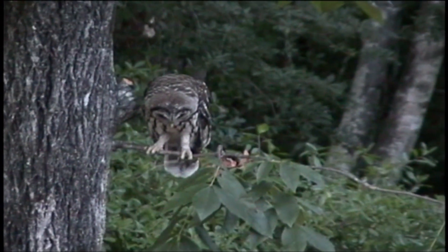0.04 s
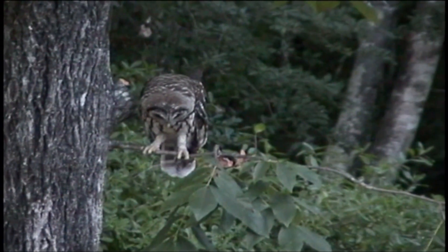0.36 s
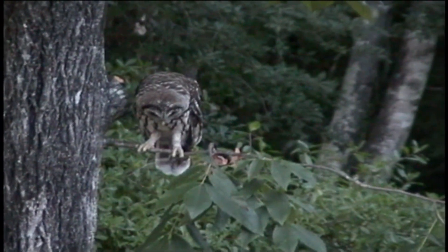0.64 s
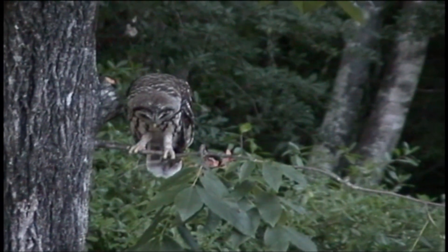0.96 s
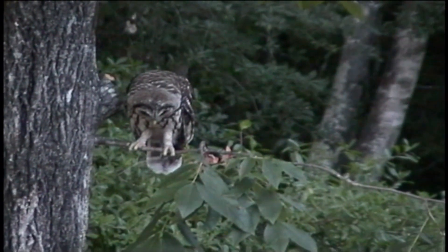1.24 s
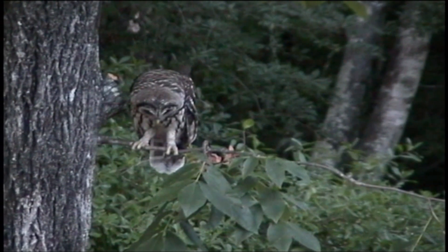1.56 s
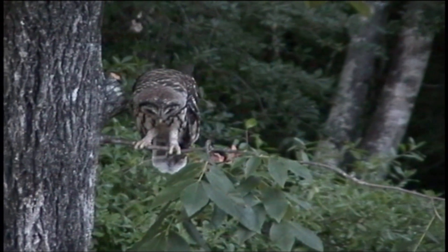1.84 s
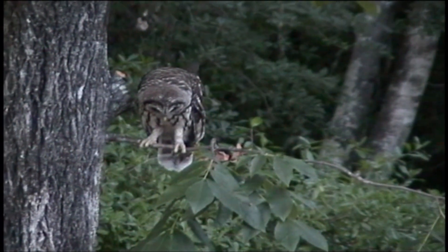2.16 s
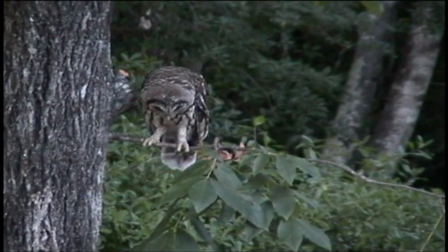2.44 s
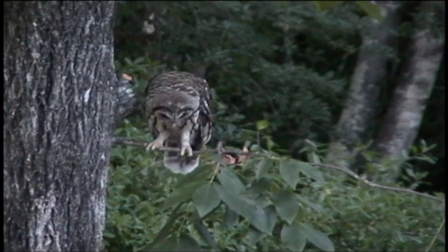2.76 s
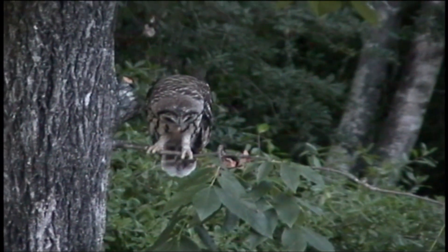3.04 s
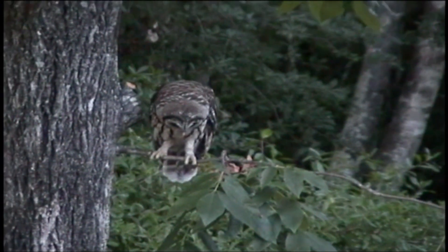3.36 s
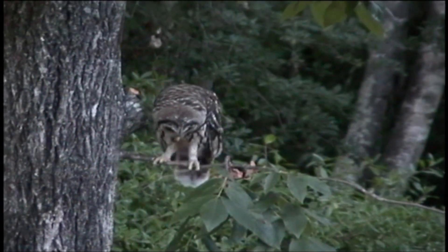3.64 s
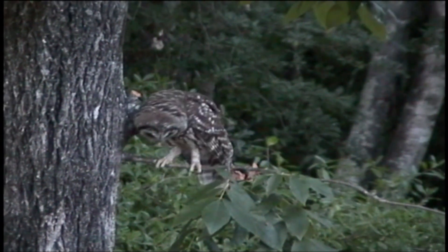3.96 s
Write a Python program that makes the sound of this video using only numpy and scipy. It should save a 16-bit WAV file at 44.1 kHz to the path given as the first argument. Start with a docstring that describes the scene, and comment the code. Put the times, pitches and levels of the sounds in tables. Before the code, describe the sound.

An owl screeches in woodland. A distant call falls away at the very start. From about 0.9 to 2 seconds, the near owl gives a hissy, rasping whistle that holds, rises, then drops sharply. A fainter owl answers from 2.8 seconds, and the near one starts again at 3.7. Throbbing insects, low rushing air and a faint motor hum continue throughout, with a few soft, distant hoots before 2 seconds.

```python
"""Begging owls in a wood

An owl on a branch gives a hissy begging screech: a rasping whistle that rises, then drops off sharply,
wrapped in the hiss of air rushing through its beak. A fainter owl calls from deeper in the wood, and the
near one starts again. Trunks and leaves scatter the calls. Behind them are a throbbing, insect-like
shrill, the low rush of the air, the hum of a distant motor and a few faint hoots."""
import sys
import numpy as np
from scipy import signal
from scipy.fft import rfft, irfft
from scipy.io import wavfile
from scipy.ndimage import uniform_filter1d

SR = 44100
rng = np.random.default_rng(int(sys.argv[2]) if len(sys.argv) > 2 else 0)


def wav_out(sig):
    """Save sig, one row per channel (or a flat mono array), as 16-bit PCM at SR to the path in sys.argv[1]."""
    wavfile.write(sys.argv[1], SR, np.round(np.clip(np.atleast_2d(sig).T, -1, 1) * 32767).astype(np.int16))


N = 176400
TIME = np.arange(N) / SR
SIDES = np.array([[1], [-1]])   # plus for the left ear, minus for the right
TOP_WHISTLE_WIDTH_HZ, THROAT_WIDTH_HZ = 500, 160   # a wider tone sounds breathier
JITTER_PER_S = 209   # how fast the main whistle's pitch trembles

# the near owl's whistle, one list per screech: time_s, pitch_hz, level_db, hoarseness (0 to 1)
WHISTLES = [
    [(.92, 4630, -52, 0.85), (1.045, 4454, -42, 0.93), (1.07, 4580, -47, .4), (1.11, 4530, -43, 0.47),
     (1.15, 4406, -39, 0.54), (1.28, 4433, -38.5, 0.57), (1.39, 4558, -45, 0.51), (1.48, 4580, -40, 0.33),
     (1.52, 4600, -41, 0.7), (1.58, 4690, -42, 0.7), (1.65, 5110, -42.5, 0.92), (1.76, 5840, -39.5, 0.73),
     (1.82, 6020, -38, 0.68), (1.875, 6170, -35.5, 0.73), (1.92, 5810, -38.5, 0.86),
     (1.942, 4920, -33.5, 0.64), (1.953, 4390, -37, 0.46), (1.962, 4200, -41, 0.4), (1.972, 3760, -33, .6)],
    [(3.70, 4690, -48, 0.95), (3.86, 4620, -45, 0.9), (3.876, 4540, -48, 0.42), (3.895, 4590, -51, 0.39),
     (3.925, 4500, -49, 0.37), (3.945, 4460, -56, 0.42), (3.968, 4380, -47, .3), (4.0, 4400, -44, 0)],
]


def from_db(db):
    """Turn decibels into a number to multiply a sound by."""
    return 10 ** (np.asarray(db) / 20)


def rms_one(x):
    """Scale a signal so that its average strength (rms) is 1."""
    return x / np.sqrt(np.mean(np.abs(x) ** 2) + 1e-20)


def at_hz(points, hz):
    """Read between the rows of a frequency table, giving every octave equal room."""
    row_hz, values = np.transpose(points)
    return np.interp(np.log(hz + 1e-9), np.log(row_hz), values)


def in_time(rows):
    """Join timed rows with straight lines, giving one curve for each column after the time."""
    time_s, *columns = np.transpose(rows)
    return [np.interp(TIME, time_s, column) for column in columns]


def gate(rows):
    """Switch a sound on at its first row and off at its last, softly enough not to click."""
    is_on = (TIME >= rows[0][0]) & (TIME <= rows[-1][0])
    return uniform_filter1d(is_on * 1., size=256)


def drift(per_s):
    """A smooth random wobble of strength 1 that moves up to about this many times a second."""
    smoothing = signal.butter(2, min(per_s, SR / 4), fs=SR / 2, output="sos")
    slow = signal.sosfilt(smoothing, rng.standard_normal(N // 2 + 8192))[8192:]   # let the filter settle
    return rms_one(np.interp(np.arange(N) / 2, np.arange(len(slow)), slow))


def phase_of(hz):
    """How far a wave of steady or moving pitch has turned, in radians."""
    return 2 * np.pi * np.cumsum(hz * np.ones(N)) / SR


def resonance(hz, width_hz):
    """Swirling air rings around one pitch, making a band of noise of strength 1."""
    phase = phase_of(hz)
    return drift(width_hz / 2) * np.cos(phase) + drift(width_hz / 2) * np.sin(phase)


def spread(mid, side, hz):
    """Blend two unrelated sounds into a wide stereo pair that sits mostly a little to the left."""
    # how alike the two ears are: frequency_hz, likeness (1 the same, 0 unrelated, -1 opposite)
    likeness = [(60, 1), (130, 0.68), (290, 1), (640, 0.88), (1410, 0.65), (3100, 0.62), (6820, 0.2),
                (15000, -0.36)]
    # how much louder the left ear is: frequency_hz, left_minus_right_db
    balance = [(100, 1.5), (1000, 0.9), (2600, 1.5), (4500, 2.5), (8000, -0.5), (15000, -0.5)]
    alike = np.clip(at_hz(likeness, hz), -.99, .99)
    pair = (np.sqrt(1 + alike) * mid + np.sqrt(1 - alike) * side * SIDES) / np.sqrt(2)
    return pair * from_db(SIDES * at_hz(balance, hz) / 2)


def wash(spectrum):
    """Wide stereo noise of strength 1, with the fine peaks and dips that echoes leave in its spectrum."""
    ripple_db, ripple_step_hz = 1.8, 35
    hz = np.arange(N // 2 + 1) * SR / N
    ripple = np.interp(hz / ripple_step_hz, np.arange(4096), rng.standard_normal(4096))
    colour = from_db(at_hz(spectrum, hz) + ripple_db * ripple) * (hz < spectrum[-1][0])
    mid, side = rfft(rng.standard_normal((2, N)))
    return rms_one(irfft(spread(mid, side, hz) * colour, N))


def air_rush():
    """The air makes a low, steady rush."""
    # the colour of the rush: frequency_hz, relative_level_db
    spectrum = [(15, -59), (25, -38), (48, -18), (81, -13), (94, -13), (108, -14), (198, -7.5), (222, -11),
                (350, -3), (421, -4.5), (554, -10.5), (596, -15.5), (654, -10), (876, -14.5), (1030, -14),
                (1130, -16), (2000, -18.5), (2600, -73), (4400, -120)]
    return from_db(-54.5) * wash(spectrum)


def motor():
    """A distant motor hums; its tones waver separately in level and together in pitch."""
    # the tones of the hum: pitch_hz, level_db
    tones = [(56.6, -77.5), (113.2, -64), (120, -66.5), (150, -70.5), (169.6, -72.5), (226.2, -68.5),
             (452, -78), (564.5, -68), (1035, -73.5), (1302, -78.5), (1360, -74.5)]
    waver_db, speed_wander = 2.5, 0.00407   # the wander is a share of the speed
    speed = 1 + speed_wander * drift(per_s=3.18)
    hum = 0
    for hz, db in tones:
        level = from_db(db + waver_db * drift(per_s=7.3))
        hum += level * np.sin(phase_of(hz * speed) + rng.uniform(0, 2 * np.pi))
    return np.sqrt(2) * hum * from_db(SIDES * 1.0)


def shrill():
    """An insect-like hiss whose narrow bands throb in one rhythm, with two ticks a cycle."""
    # the colour of the hiss: frequency_hz, relative_level_db
    spectrum = [(1850, -35), (2100, -10.5), (2400, -6), (3300, -2.5), (4400, -2.5), (5100, 3), (6100, -1.5),
                (7000, -8), (8000, -16), (10000, -13.5), (12000, -18), (14500, -25.5), (16000, -31)]
    # the throbbing bands: pitch_hz, width_hz, level_db, peak_place (0 to 1 of a cycle), swing_db
    bands = [(2491, 220, -59, 0.26, 6), (2911, 130, -56, 0.34, 3), (3717, 39, -55.5, 0.36, 7),
             (3875, 51, -56.5, 0.29, 1), (4410, 350, -50, 0.42, 1), (4914, 36, -53.5, 0.17, 2),
             (5860, 41, -58.5, 0.15, 2)]
    # the slow swell of the whole shrill: time_s, gain_db
    swell = [(0, 0.6), (.5, 0), (2.1, 0.6), (2.5, -0.2), (3.0, 0.5), (4.0, 0.5)]
    throbs_per_s, tick_db, tick_s, tick_places = 11.082, 3, 0.014, (0, 0.53)
    sound = from_db(-42.5) * wash(spectrum)
    for hz, width_hz, db, peak_place, swing_db in bands:
        cycle = TIME * throbs_per_s - peak_place
        seconds_from_ticks = [((cycle - place + .5) % 1 - .5) / throbs_per_s for place in tick_places]
        ticks = sum(np.exp(-(gap_s / tick_s) ** 2) for gap_s in seconds_from_ticks)
        throb = rms_one(from_db(swing_db * np.cos(2 * np.pi * cycle) + tick_db * ticks))
        band = spread(resonance(hz, width_hz), resonance(hz, width_hz), hz)
        sound += from_db(db) * throb * band
    swell_db, = in_time(swell)
    return from_db(swell_db) * sound


def airy_tone(rows, width_hz):
    """A breathy whistle that follows rows of time_s, pitch_hz, level_db."""
    hz, db = in_time(rows)
    return gate(rows) * from_db(db) * resonance(hz, width_hz)


def beak_hiss(rows):
    """Air rushes through the beak, which rings at higher pitches as it opens."""
    # where the beak rings: pitch_hz (before stretching), width_hz, relative_level_db
    beak = [(990, 590, -17.5), (1390, 230, -22.5), (1959, 150, -15), (3302, 2000, -10.5), (4287, 500, -1),
            (5540, 900, -4.5), (7550, 1440, -6), (9460, 670, -14), (11560, 1400, -18), (13700, 750, -28.5)]
    db, stretch = in_time(rows)
    ringing = sum(from_db(ring_db) * resonance(hz * stretch, width_hz) for hz, width_hz, ring_db in beak)
    return gate(rows) * from_db(db) * ringing


def woodland(sound, echo_db):
    """Trunks and leaves send back short echoes from the sides, which widen the sound."""
    fade_s = 0.4   # time to fall by 60 dB
    t = TIME[:SR // 2]
    echoes = rng.standard_normal(len(t)) * from_db(-60 * t / fade_s)
    echoes /= np.sqrt(np.sum(echoes ** 2))
    return sound + from_db(echo_db) * signal.fftconvolve(sound, echoes)[:N] * SIDES


def far_owl():
    """From deeper in the wood come the falling end of one screech and, later, a soft answer."""
    # its whistle, one list per screech: time_s, pitch_hz, level_db
    whistles = [
        [(0, 5950, -56), (.03, 5850, -46), (.06, 5130, -43.5), (.083, 4340, -48), (.10, 4120, -56)],
        [(2.85, 5000, -56), (3.1, 5134, -47.5), (3.33, 5290, -48), (3.45, 5360, -51), (3.6, 5530, -48),
         (3.8, 5620, -53)],
    ]
    # the thin, high whistle of its answer: time_s, pitch_hz, level_db
    top_whistle = [(2.8, 10500, -72), (2.9, 10560, -65), (3.25, 10430, -61.5), (3.5, 10540, -71)]
    # the hiss of its first screech: time_s, level_db, beak_stretch (times the beak's pitches)
    breath = [(0, -53, 0.99), (.09, -56, 0.92), (.17, -60, 0.79)]
    # the low throat tone of its first screech: time_s, pitch_hz, level_db
    throat = [(0, 1320, -67), (.1, 1286, -59.5), (.22, 1290, -63)]
    voice = sum(airy_tone(rows, width_hz=240) for rows in whistles)
    voice += airy_tone(top_whistle, TOP_WHISTLE_WIDTH_HZ)
    voice += beak_hiss(breath)
    voice += airy_tone(throat, THROAT_WIDTH_HZ)
    return woodland(voice, echo_db=-7.0) * from_db(SIDES * 1.3)


def hoots():
    """Soft, wavering tones swell and fade in the distance."""
    # the hoot-like swells: peak_s, half_length_s, pitch_hz, level_db
    swells = [(0.09, 0.1, 360, -55.5), (0.53, 0.071, 380, -54), (1.21, 0.04, 394.4, -58.5),
              (1.699, 0.16, 370.7, -61), (1.86, 0.037, 329.5, -59)]
    waver_hz = 12.6
    sound = 0
    for peak_s, half_length_s, hz, db in swells:
        level = from_db(db) * np.exp(-((TIME - peak_s) / half_length_s) ** 2)
        sound += level * np.sin(phase_of(hz + waver_hz * drift(per_s=28.3)))
    return np.sqrt(2) * sound


def hiss_echoes(sound):
    """Hiss reaches each ear with its own short trail of echoes from leaves and trunks."""
    echo_db, fade_s = -2.5, 0.12   # the trail falls by 60 dB in fade_s
    t = TIME[:SR // 2]
    echoes = rng.standard_normal((2, len(t))) * from_db(-60 * t / fade_s)
    echoes /= np.sqrt(np.sum(echoes ** 2, axis=1, keepdims=True))
    return sound + from_db(echo_db) * signal.fftconvolve(sound[None], echoes, axes=1)[:, :N]


def puffs():
    """Sudden puffs of hiss escape as the beak opens and shuts."""
    # the puffs: peak_s, half_length_s, pitch_hz, width_hz, level_db
    bursts = [(0.927, .04, 10900, 1600, -56), (1.923, .016, 11200, 1200, -53),
              (1.969, 0.0083, 7470, 700, -45), (3.708, .034, 11000, 1400, -53),
              (3.715, .025, 7400, 600, -52), (3.75, 0.078, 1904, 197, -61)]
    sound = 0
    for peak_s, half_length_s, hz, width_hz, db in bursts:
        level = from_db(db) * np.exp(-((TIME - peak_s) / half_length_s) ** 4)   # flat top, steep edges
        sound += level * resonance(hz, width_hz)
    return sound


def whistle(rows):
    """The main whistle: a clean tone gives way to noise as it gets hoarser, and rasps most halfway."""
    jitter_hz, width_hz = 140.2, 310
    octave_db, octave_width_hz = -17.5, 990
    rasp_db, rasp_per_s = 0.9, 96
    hz, db, hoarseness = in_time(rows)
    hoarseness = np.clip(hoarseness, 0, 1)
    roughness = np.sqrt(hoarseness)
    core = np.sqrt(2) * np.sin(phase_of(hz + roughness * jitter_hz * drift(JITTER_PER_S)))
    breath = resonance(hz, width_hz) + from_db(octave_db) * resonance(2 * hz, octave_width_hz)
    tone = np.sqrt(1 - hoarseness) * core + roughness * breath
    depth = np.log(from_db(rasp_db)) * 4 * hoarseness * (1 - hoarseness)
    rasp = np.exp(depth * np.minimum(drift(rasp_per_s), 2) - depth ** 2)   # a fast flutter in level
    return gate(rows) * from_db(db) * tone * rasp


def spurts():
    """The whistle catches and breaks through the hiss in brief, unsteady swells on its own pitch."""
    # the moments when it catches: peak_s, half_length_s, level_db
    catches = [(1.074, 0.0088, -37), (1.103, 0.0087, -37), (1.15, .0025, -36), (1.16, 0.0046, -34),
               (1.184, 0.0054, -37), (1.213, 0.0023, -32), (1.229, 0.0026, -30), (1.262, 0.0069, -38),
               (1.2825, .0035, -29.5), (1.2975, 0.0015, -32), (1.319, 0.0053, -34), (1.3318, 0.0037, -29.5),
               (1.352, 0.0059, -36.5), (1.376, .006, -35), (1.390, 0.0085, -34.5), (1.403, 0.0028, -32.5),
               (1.429, 0.0044, -31.5), (1.439, 0.0032, -34.5), (1.46, .005, -39), (1.476, 0.012, -37),
               (1.561, 0.0062, -37), (1.953, .0045, -28.5), (3.875, 0.0046, -32), (3.89, .002, -33),
               (3.895, 0.0066, -34), (3.913, 0.0095, -34), (3.959, 0.0086, -34.5), (3.981, 0.0041, -36),
               (3.989, 0.0058, -32.5), (3.998, .003, -35)]
    jitter_hz = 54
    hz = in_time([row for rows in WHISTLES for row in rows])[0]
    level = sum(from_db(db) * np.exp(-((TIME - peak_s) / half_length_s) ** 2)
                for peak_s, half_length_s, db in catches)
    return np.sqrt(2) * level * np.sin(phase_of(hz + jitter_hz * drift(JITTER_PER_S)))


def near_owl():
    """The owl on the branch screeches twice, mixing whistled tones with hissing breath."""
    # the low throat tone at the height of the first screech: time_s, pitch_hz, level_db
    throat = [(1.58, 1951, -63), (1.76, 2065, -52.5), (1.87, 2176, -47), (1.92, 2213, -48),
              (1.96, 2190, -63)]
    # the hiss, one list per screech: time_s, level_db, beak_stretch (times the beak's pitches)
    hisses = [
        [(.84, -56, 1.1), (.90, -49, 0.94), (1.10, -49, 1.03), (1.55, -47, 0.94), (1.70, -47, 1.03),
         (1.87, -42.5, 1.09), (1.94, -47, 1.09), (1.97, -51, 0.89), (1.985, -58, 1.0)],
        [(3.65, -54, 1), (3.685, -48.5, 0.98), (3.83, -48.5, 0.98), (4.0, -48.5, 1)],
    ]
    # the thin, high whistle, one list per screech: time_s, pitch_hz, level_db
    top_whistles = [
        [(.85, 10470, -62), (.92, 10400, -47.5), (.98, 10180, -52), (1.06, 10350, -52.5), (1.2, 10300, -57.5),
         (1.56, 10330, -55), (1.585, 10300, -51.5), (1.65, 10600, -50), (1.75, 10740, -56), (1.92, 10800, -53),
         (1.96, 10400, -68)],
        [(3.67, 10400, -70), (3.69, 10300, -56), (3.755, 10400, -49), (3.80, 10300, -50.5), (3.85, 10200, -47),
         (3.89, 10130, -57), (4.0, 9800, -63)],
    ]
    # a steady ring that stays under the rising whistle: time_s, pitch_hz, level_db
    low_ring = [(1.5, 4420, -52.5), (1.7, 4385, -51), (1.9, 4443, -53), (1.95, 4420, -38)]
    tones = sum(map(whistle, WHISTLES)) + spurts() + airy_tone(throat, THROAT_WIDTH_HZ)
    breath = sum(map(beak_hiss, hisses)) + puffs()
    breath += sum(airy_tone(rows, TOP_WHISTLE_WIDTH_HZ) for rows in top_whistles)
    breath += airy_tone(low_ring, width_hz=286)
    return woodland(tones, echo_db=-15.5) * from_db(SIDES * 0.3) + hiss_echoes(breath)


def scene():
    """Both owls call over the background of the wood."""
    return near_owl() + far_owl() + shrill() + motor() + hoots() + air_rush()


def record(dry):
    """The highest treble is cut off steeply."""
    cutoff_hz = 15100
    treble_cut = signal.ellip(10, .1, 80, cutoff_hz, fs=SR, output="sos")
    return signal.sosfilt(treble_cut, dry)


dry = scene()
out = record(dry)
wav_out(out)
```